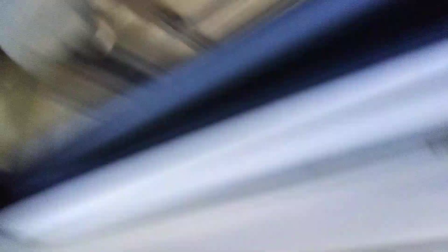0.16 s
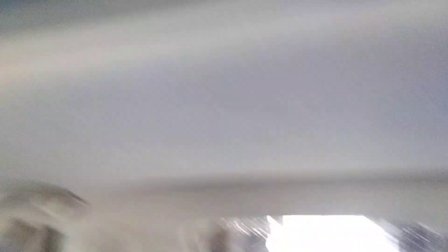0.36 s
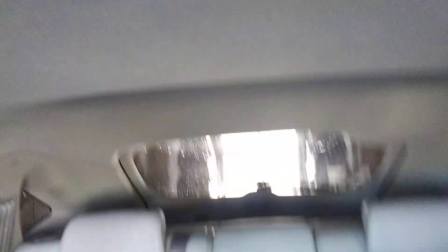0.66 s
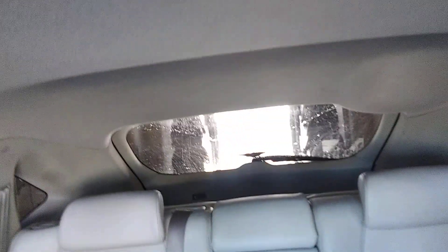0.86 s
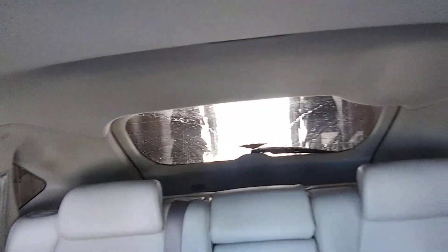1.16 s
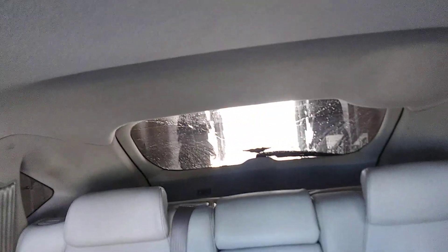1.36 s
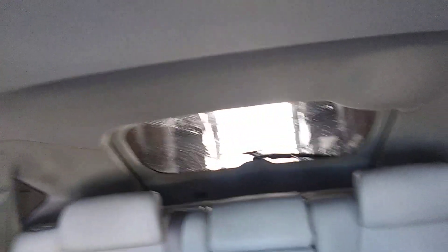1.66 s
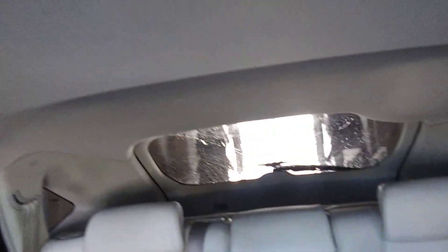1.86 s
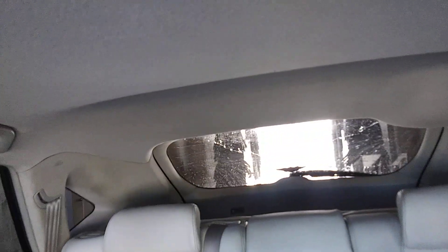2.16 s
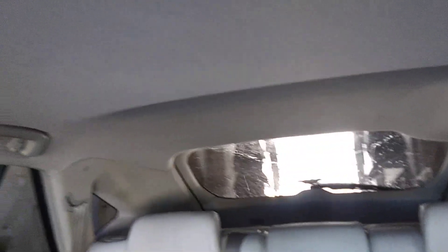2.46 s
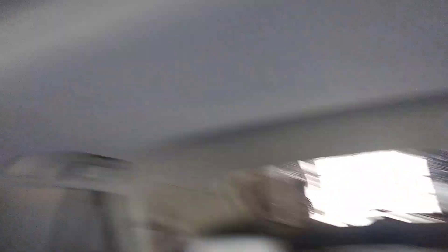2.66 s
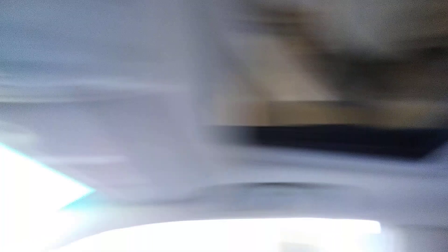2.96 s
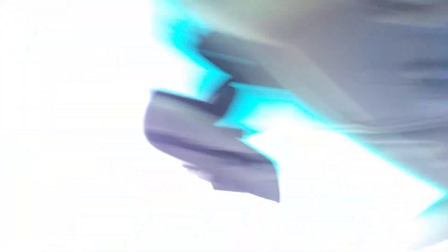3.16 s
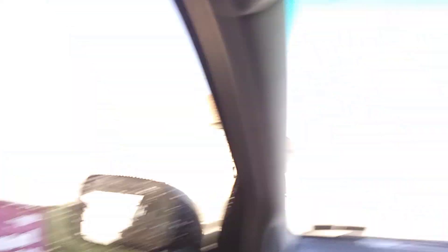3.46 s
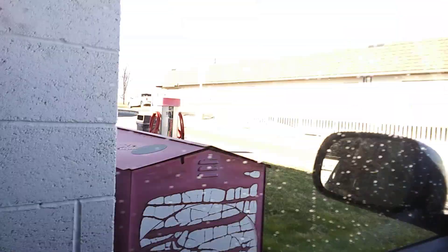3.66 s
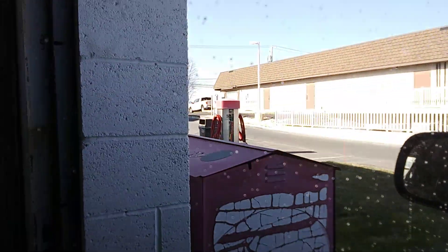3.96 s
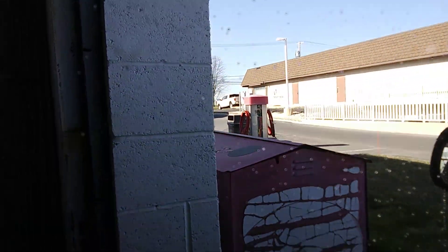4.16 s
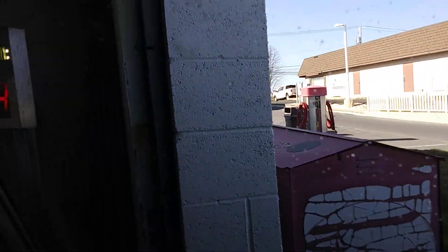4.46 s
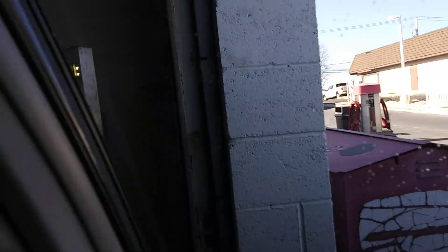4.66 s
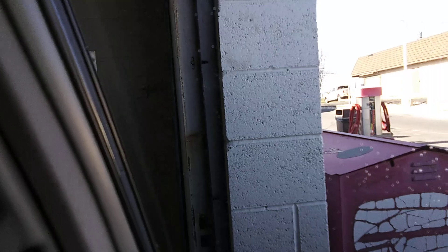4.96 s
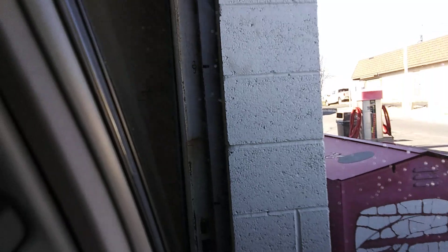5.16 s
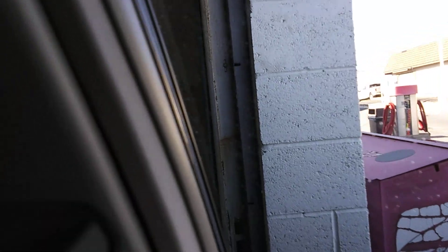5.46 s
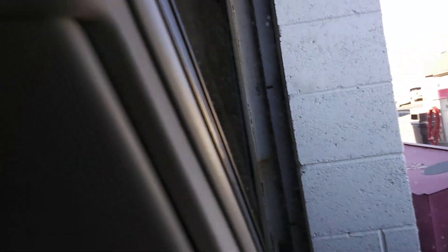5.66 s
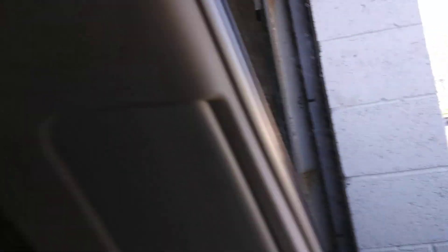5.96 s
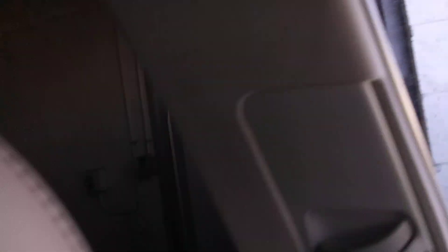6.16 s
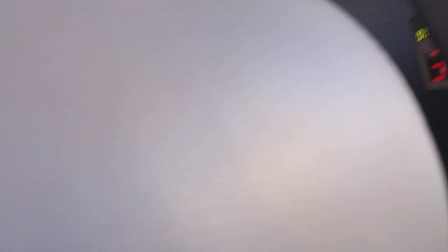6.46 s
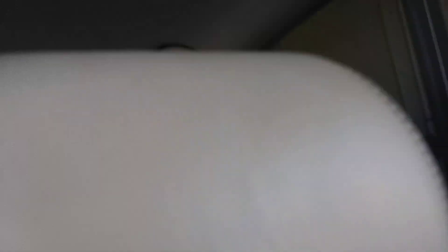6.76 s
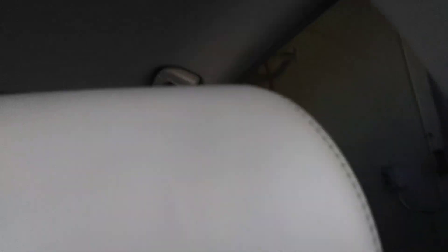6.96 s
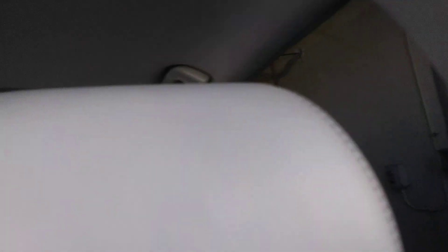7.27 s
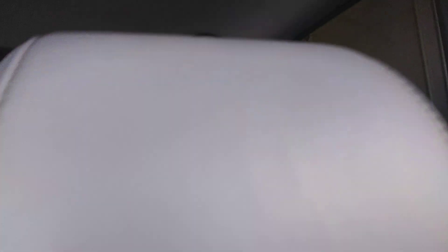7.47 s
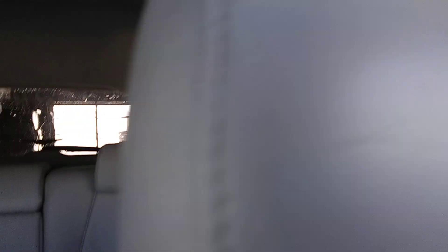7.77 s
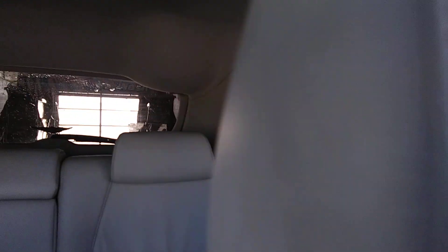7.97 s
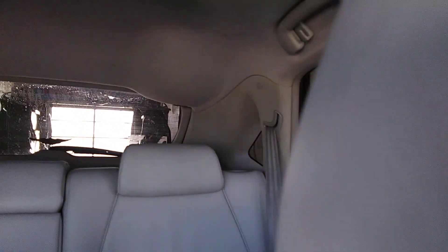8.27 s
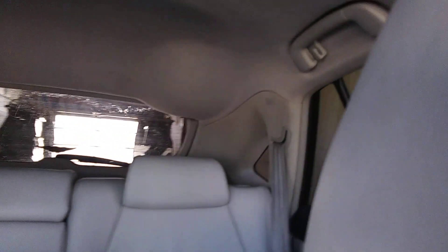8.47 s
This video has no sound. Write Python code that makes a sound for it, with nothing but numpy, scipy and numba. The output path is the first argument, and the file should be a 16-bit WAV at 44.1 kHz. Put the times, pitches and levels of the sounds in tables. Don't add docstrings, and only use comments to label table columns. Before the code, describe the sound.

Car wash dryers roar constantly around a sealed cabin, a dense low-heavy wind noise fluttering slightly, shaded by a soft mid-pitched blade hum.

```python
import sys
import numpy as np
from scipy import signal
from scipy.fft import rfft, irfft, next_fast_len
from scipy.io import wavfile
from scipy.ndimage import uniform_filter1d, minimum_filter1d
from numba import njit

SR = 44100
rng = np.random.default_rng(int(sys.argv[2]) if len(sys.argv) > 2 else 0)


def nominal_scale(level):
    x = np.asarray(level, float) / 20
    return 10 ** x


def transcribe(signal):
    frames = np.atleast_2d(signal).T
    limited = np.clip(frames, -1, 1)
    pcm = np.round(limited * 32767).astype(np.int16)
    wavfile.write(sys.argv[1], SR, pcm)


N = 379260

# [t/s, jets heard through the side glass level/dB,
# nearness of a door seal level/dB, nearness of the roof level/dB]
PHONE = [(0, 0, -2.5, -3.5), (.3, 1, -0.5, 2.5), (.65, -1, 0, -2), (1.2, -2, 2, -1), (1.8, -3.5, 4.5, 0.5),
         (2.1, -1, 2, 1), (2.5, 1, 1.5, 0.5), (3, 0, 1, 0), (3.5, 1.5, -1.5, -2), (3.95, .5, 4.5, -3.5),
         (4.4, 1.5, 3, -2.5), (4.8, 2, -3, -3), (5.7, 1.5, -2, -4), (6.3, 1, 1, 2), (6.62, -1, 1.5, -0.5),
         (7.2, -1, 1, 1), (7.8, -1, 0.5, 3.5), (8.6, -2.5, -3.5, 2.5)]
# [f/Hz, share dB/dB]
GLASS_SHARE = [(100, -0.068), (260, -0.7), (400, -0.077), (800, 0.35), (1300, .9), (2500, 0.86),
               (6000, 0.93)]
# [f/Hz, share dB/dB]
ROOF_SHARE = [(100, .05), (200, .1), (330, .4), (480, 0.59), (750, 1), (1200, .1)]
# [f/Hz, share dB/dB]
SEAL_SHARE = [(2000, 0.05), (3000, 0.16), (3800, .5), (4600, 0.61)]
# [f/Hz, level/dB]
REAR_BOOM = [(110, 0.5), (160, 1), (220, 4), (290, 0), (360, 1), (450, 1.7)]
# [t/s, level/dB]
LULLS = [(.12, -5), (.2, 3.5), (.35, -4.5), (.95, -4.5), (1.32, -1.5), (1.7, 0.5), (1.85, -4), (2.2, -3),
         (2.55, -3.5), (2.63, -6.5), (3.2, -1.5), (4.36, 0), (6.25, 1.5), (6.64, -3.5), (7.42, -4.5),
         (7.9, -2.5)]
# [f/Hz, level/dB per Hz]
RUSH_COLOUR = [(12, -42.5), (36, -36.5), (62, -15), (100, -3.5), (180, -1), (270, -2), (320, -7),
               (470, -11), (820, -19.5), (930, -22), (2300, -26), (2700, -28), (3300, -33.5), (4200, -43),
               (4900, -60)]
# [f/Hz, width/Hz]
CABIN_MODES = [(127, 34), (165, 34), (212, 28), (250, 22), (288, 20), (355, 40)]
# [f/Hz, t/s, length/s, level/dB]
PEAKS_MET = [(212, 0.63, 0.48, -14.5), (212, 1.46, 0.53, -12.5), (212, 5.77, 0.44, -21),
             (212, 2.53, 0.14, -19), (250, 2.47, 0.17, -20), (355, 1.05, 0.15, -19.5),
             (355, 1.78, 0.16, -20), (250, 1.2, 0.35, -13.5), (250, 1.6, .2, -17.5), (250, 1.95, 0.49, -15),
             (250, 6.6, 1, -24), (287, 0.13, .4, -19), (287, 0.76, 0.35, -15.5), (287, 1.2, 0.45, -18),
             (287, 1.88, 0.23, -13), (287, 2.14, 0.41, -15.5), (250, 1.8, .25, -21), (165, 1.75, 0.39, -18),
             (287, 6.9, 0.33, -23), (287, 2.9, 0.4, -24.5), (287, 5.5, 0.37, -27.5), (287, 12, 0.72, -30),
             (212, 4.26, 0.21, -25), (212, 5.25, 0.25, -20), (355, 5.7, 0.49, -23.5), (165, 1.2, 1, -25),
             (165, 4.4, 0.48, -25), (165, 7.35, 0.33, -15.5), (165, 8.4, 0.49, -19.5),
             (126, 3.6, 0.61, -16.5), (126, 4.19, 0.51, -16.5), (126, 8.4, 0.35, -31),
             (126, 6.95, 0.28, -19.5), (126, 8.6, 0.33, -29), (355, 2.5, 0.65, -22),
             (355, 3.3, 0.82, -24.5), (355, 4.94, .7, -20.5), (355, 7.95, 0.62, -27.5)]
# [f/Hz, level/dB per Hz]
SEAL_COLOUR = [(3500, -23.5), (4700, -1.5), (5700, 0.5), (6200, 1.5), (6600, 0), (7300, -0.5), (7650, -4),
               (7950, -21.5), (8250, -24.5), (8400, -34), (8500, -46.5)]
# [f/Hz, level/dB]
FANS = [
    (525.5, .5),
    (523.5, -19),
    (513, -19),
]
# [multiple of blade rate, level/dB]
OVERTONES = [(2, -49), (3, -51)]
# [t/s, length/s, level/dB]
TONE_MET = [(2.1, .2, -30), (2.55, .1, -30), (3.9, .25, -28), (4.25, .1, -29), (4.75, .35, -30),
            (5.12, .16, -25), (5.28, .2, -22), (5.64, .1, -27), (6.35, .1, -29), (6.78, .1, -28),
            (7.08, .2, -24.5), (7.33, .24, -22), (7.76, .1, -20), (8.28, .19, -20)]
# [f/Hz, width/Hz, swells [t/s, length/s, level/dB]]
PANES = [
    (2210, 520, [(.25, 0.55, -30), (1.9, 0.97, -36.5), (2.95, 0.81, -34), (4.5, 1, -37), (5.85, 0.66, -36), (8, 0.24, -42)]),
    (1270, 370, [(4.3, 0.43, -36.5), (7.1, .6, -31.5)]),
    (900, 240, [(.2, 0.57, -32.5), (2.9, .7, -35.5), (7, 0.36, -32.5), (8.3, .6, -34.5)]),
]
# [f/Hz, t/s, length/s, level/dB]
WHISTLES = [
    (6150, 7.3, 1.4, -57),
    (6760, 7.15, .4, -56),
    (5350, 4.4, .6, -60.5),
    (7400, 6.22, .25, -57),
]


def curves(table):
    s, *columns = np.transpose(table)
    return np.array([np.interp(np.arange(N) / SR, s, c) for c in columns])


def share(table, hz):
    points, values = np.transpose(table)
    return np.interp(np.log(hz), np.log(points), values)


def bumps(times_s, lengths_s, sizes):
    t = np.arange(0, N + 64, 64) / SR
    total = sum(g * .5 ** ((2 * (t - s) / w) ** 2) for s, w, g in np.broadcast(times_s, lengths_s, sizes))
    return np.interp(np.arange(N) / SR, t, total)


def met(rows, rest_db):
    s, length_s, db = np.transpose(rows)
    return np.sqrt(nominal_scale(2 * rest_db) + bumps(s, length_s, nominal_scale(2 * db)))


def turning():
    controls = curves(PHONE)
    return controls - controls.mean(axis=1, keepdims=True)


def walk(rate, size=32):
    k, steps = int(SR / size / rate), N // size + 2
    draws = rng.standard_normal(N // 100)[:steps // k + 1]
    held = np.repeat(draws, k)[:steps]
    slow = uniform_filter1d(uniform_filter1d(held, k), k)
    return 1.283 * np.interp(np.arange(N) / size, np.arange(steps), slow)


def bands(colour, per_octave):
    size = next_fast_len(N)
    hz = np.arange(1, size // 2 + 2) * SR / size
    points, points_db = np.transpose(colour)
    db = np.interp(np.log(hz), np.log(points), points_db, right=-150)
    spectrum = rfft(rng.standard_normal(size)) * nominal_scale(db)
    spectrum = spectrum / np.std(irfft(spectrum, size))
    place = np.clip(per_octave * np.log2(hz / points[0]), 0, None)
    for k in range(int(per_octave * np.log2(points[-1] / points[0])) + 2):
        triangle = np.clip(1 - np.abs(place - k), 0, 1)
        yield points[0] * 2 ** (k / per_octave), irfft(spectrum * triangle, size)[:N]


def ring(hz, width_hz, steady_s=0.13):
    mode = signal.iirpeak(hz, hz / width_hz, fs=SR)
    sound = signal.lfilter(*mode, signal.lfilter(*mode, rng.standard_normal(N)))
    k = int(steady_s * SR)
    power = uniform_filter1d(uniform_filter1d(sound ** 2, k), k)
    return sound / np.sqrt(power + 1e-12)


def rush(flutter, rush_db=-11.0, flutter_db=0.41, own_db=0.5, drum_db=1.22):
    glass, seal, roof = turning()
    rear = bumps(1.2, 1.8, 1)
    out = 0
    for hz, noise in bands(RUSH_COLOUR, per_octave=3):
        exposed = np.clip(hz / 1500.0, .15, 1)
        turn = share(GLASS_SHARE, hz) * glass + share(ROOF_SHARE, hz) * roof
        turn = turn + share(SEAL_SHARE, hz) * seal + share(REAR_BOOM, hz) * rear
        drumming = (1 - exposed) * drum_db * walk(3.4)
        gusts = exposed * (flutter_db * flutter + own_db * walk(14.))
        out = out + noise * nominal_scale(turn + drumming + gusts)
    return out * nominal_scale(rush_db)


def cabin(rest_db=-35.5):
    out, waves_hz = 0, np.transpose(CABIN_MODES)[0]
    for hz, width_hz in CABIN_MODES:
        rows = [row[1:] for row in PEAKS_MET if waves_hz[np.argmin(np.abs(waves_hz - row[0]))] == hz]
        out = out + ring(hz, width_hz) * met(rows, rest_db)
    return out


def seals(flutter, hiss_db=-49.5, flutter_db=0.3, patch_db=1.6):
    (glass, seal, _), out = turning(), 0
    for hz, noise in bands(SEAL_COLOUR, per_octave=6):
        nearness = np.interp(hz, [5000, 7000], [1.2, .7]) * seal
        out = out + noise * nominal_scale(nearness + patch_db * walk(4.) + 0.72 * walk(14.))
    return out * nominal_scale(hiss_db + 0.95 * glass + flutter_db * flutter)


def blades(wander_hz=1.1, flicker_db=1.1, overtone_flicker_db=3.0):
    out, tone = 0, met(TONE_MET, rest_db=-38)
    for hz, db in FANS:
        phase = 2 * np.pi * (np.cumsum(hz + wander_hz * walk(5.)) / SR + rng.random())
        overtones = 0
        for k, level_db in OVERTONES:
            overtones = overtones + nominal_scale(level_db + overtone_flicker_db * walk(3.3)) * np.sin(k * phase)
        fundamental = tone * nominal_scale(flicker_db * walk(20.)) * np.sin(phase)
        out = out + np.sqrt(2) * nominal_scale(db) * (fundamental + overtones)
    return out


def panes():
    return sum(ring(hz, width_hz) * met(rows, rest_db=-60.5) for hz, width_hz, rows in PANES)


def whistles(width_hz=300):
    return sum(ring(hz, width_hz) * bumps(s, length_s, nominal_scale(db)) for hz, s, length_s, db in WHISTLES)


@njit
def recover(need, step):
    gain, g = np.empty(len(need)), 1.
    for i in range(len(need)):
        g = min(need[i], g + (1 - g) * step)
        gain[i] = g
    return gain


def scene(lull_length_s=0.043, mic_gain_db=1.52):
    lull_s, lull_db = np.transpose(LULLS)
    flutter = walk(18.) + 1.6 * bumps(lull_s, lull_length_s, lull_db)
    air = rush(flutter) + cabin() + seals(flutter)
    tones = blades() + panes() * nominal_scale(.5 * flutter) + whistles()
    return nominal_scale(mic_gain_db) * (air + tones)[None]


def roll_off(x):
    return signal.sosfilt(signal.butter(12, 8500, fs=SR, output="sos"), x)


def record(dry, ceiling=.89, attack_ms=2.0, release_ms=41.0, top_hz=8350):
    k = max(int(attack_ms * SR / 1000), 3)
    need = np.minimum(1, ceiling / (np.abs(dry[0]) + 1e-9))
    ducked = recover(minimum_filter1d(need, k + 2), 1000 / (release_ms * SR))
    gain = uniform_filter1d(ducked, k)
    top = signal.ellip(10, .005, 50, top_hz, fs=SR, output="sos")
    return roll_off(signal.sosfiltfilt(top, dry * gain))


dry = scene()
out = record(dry)
transcribe(out)
```